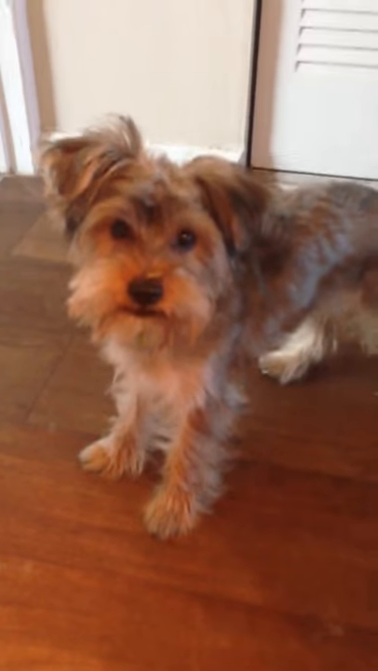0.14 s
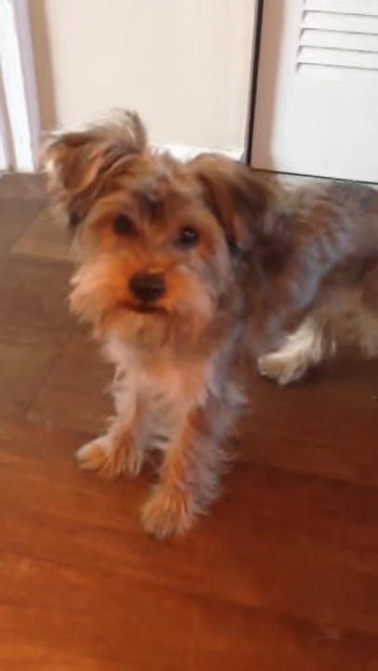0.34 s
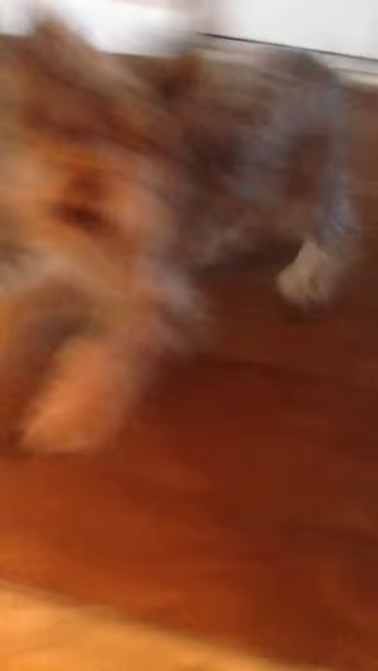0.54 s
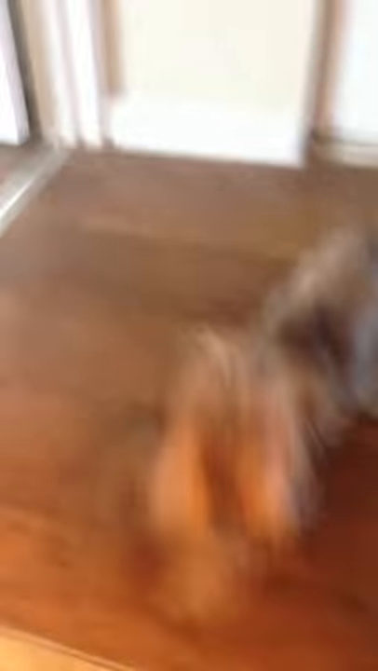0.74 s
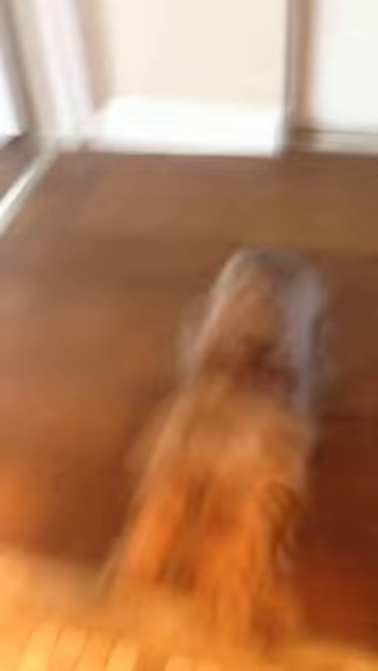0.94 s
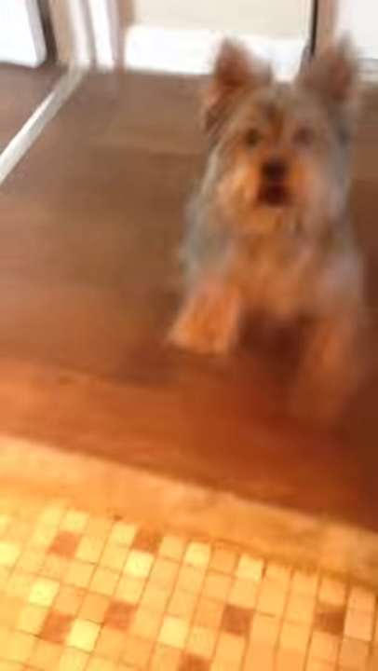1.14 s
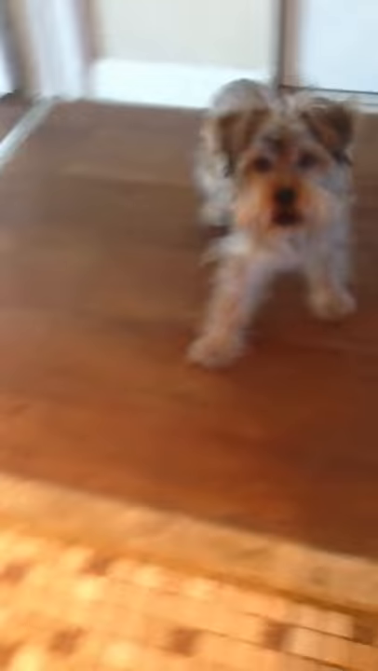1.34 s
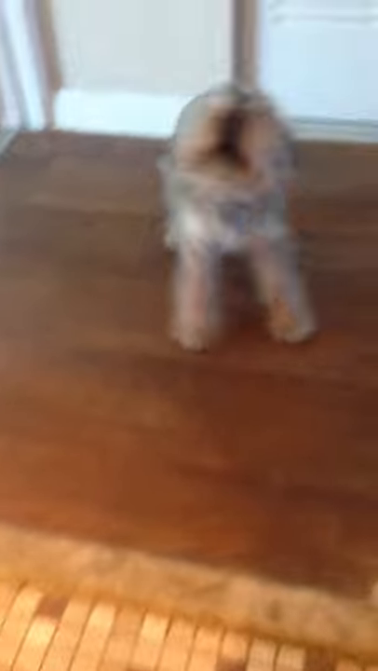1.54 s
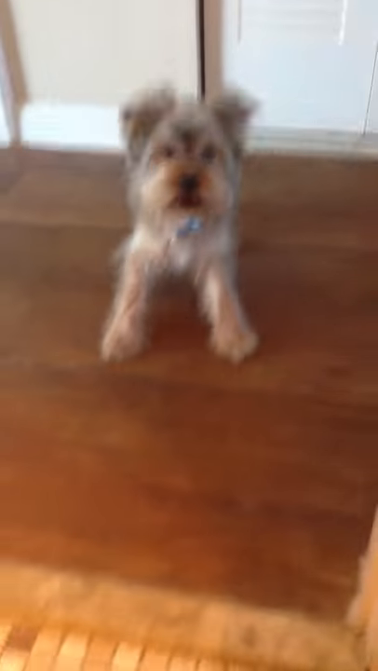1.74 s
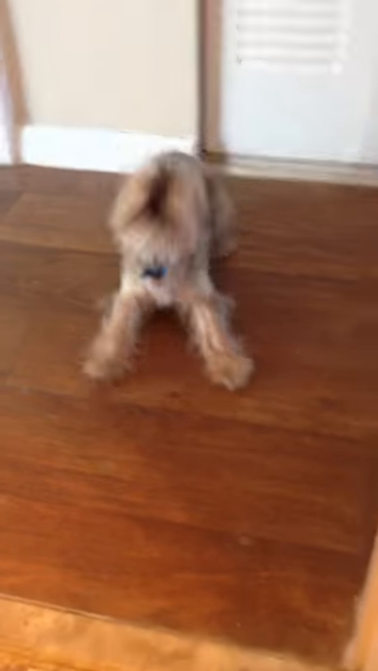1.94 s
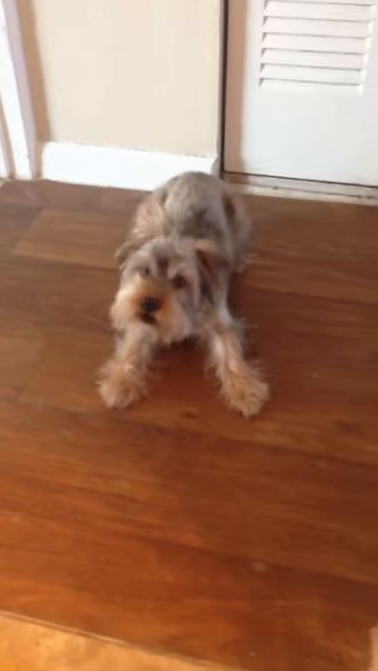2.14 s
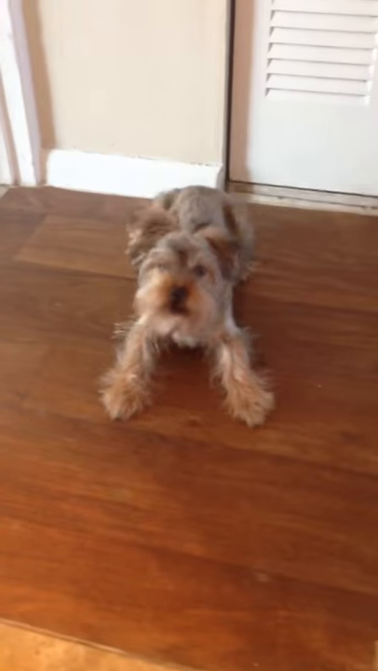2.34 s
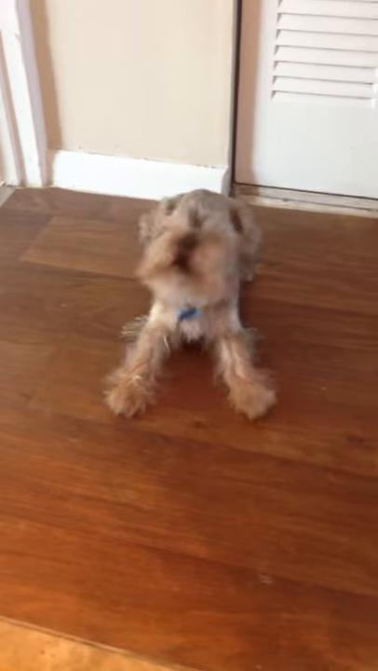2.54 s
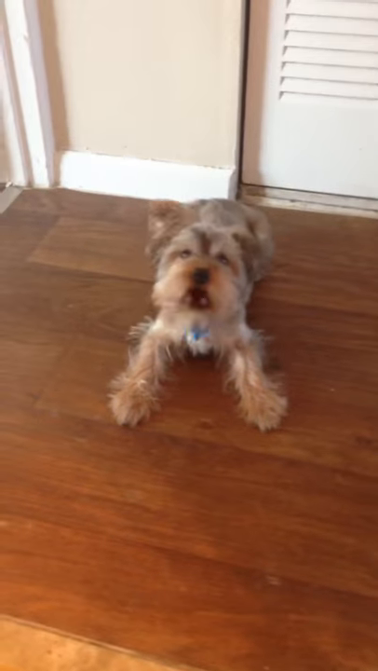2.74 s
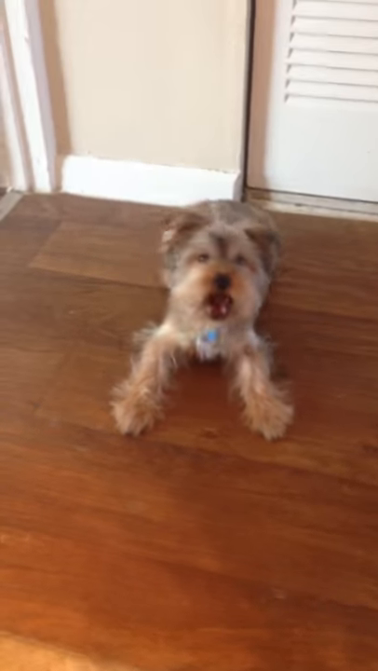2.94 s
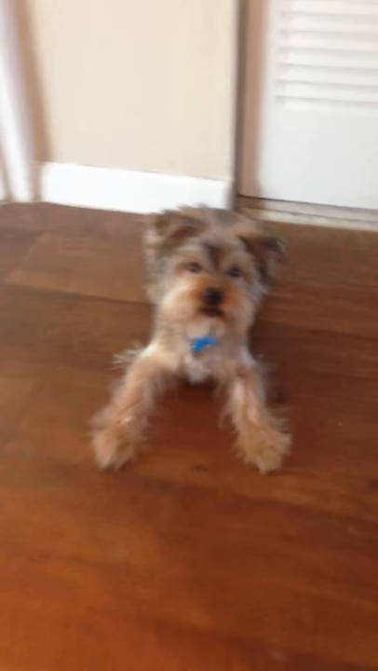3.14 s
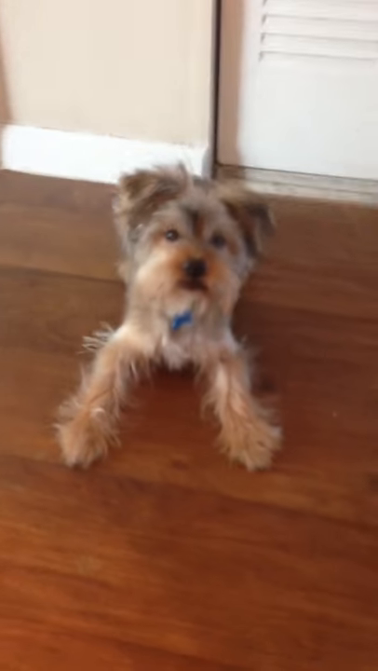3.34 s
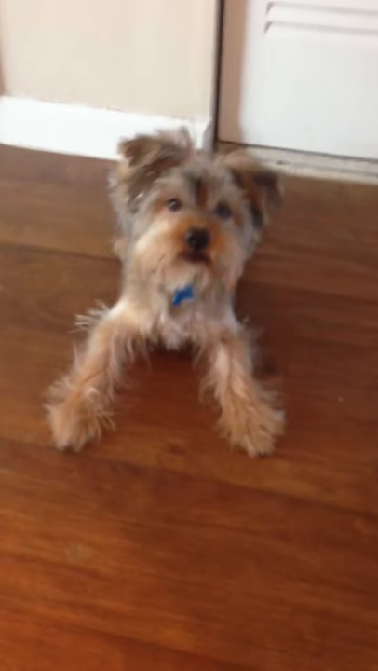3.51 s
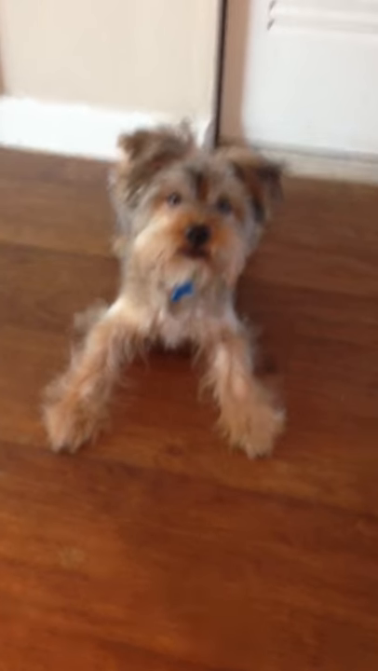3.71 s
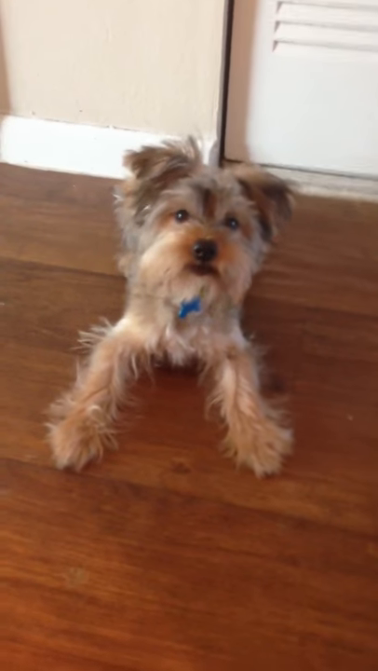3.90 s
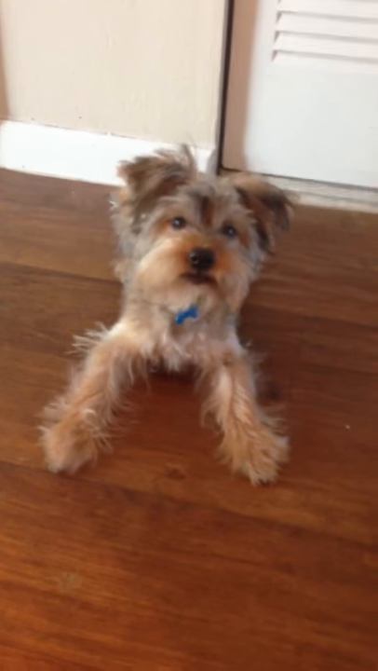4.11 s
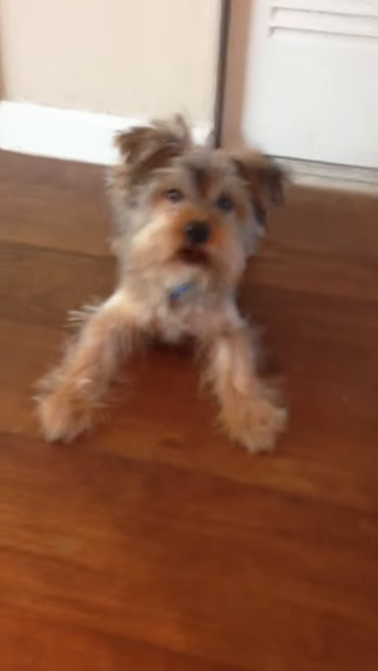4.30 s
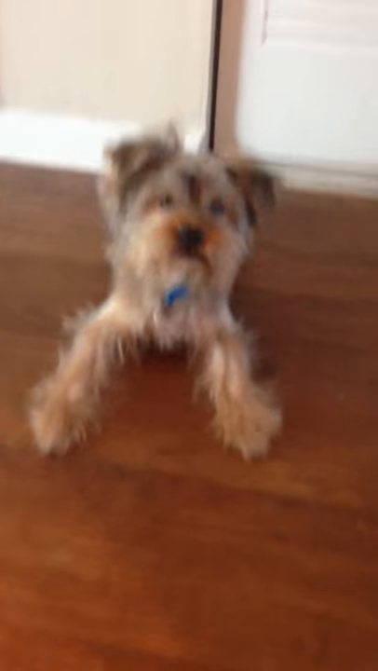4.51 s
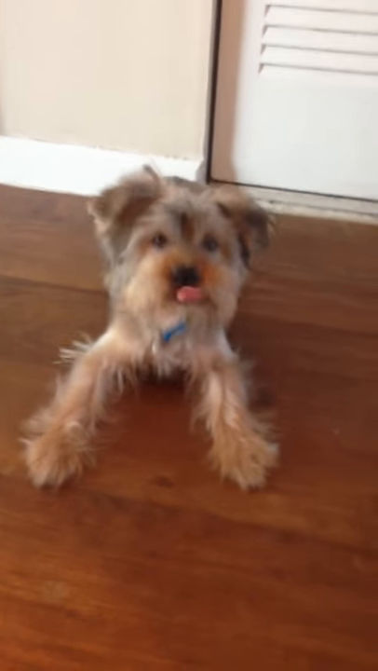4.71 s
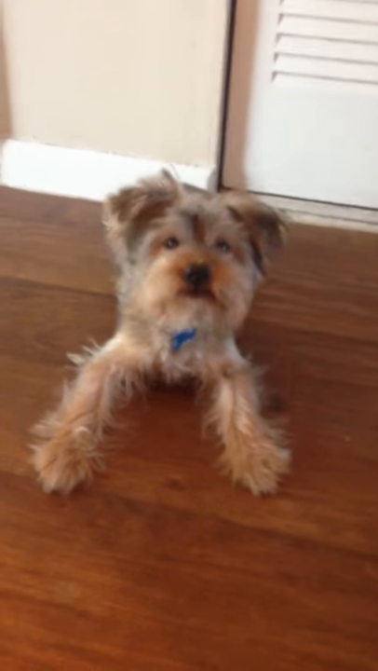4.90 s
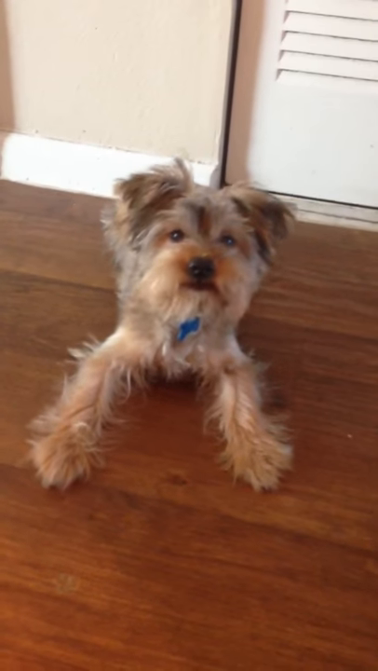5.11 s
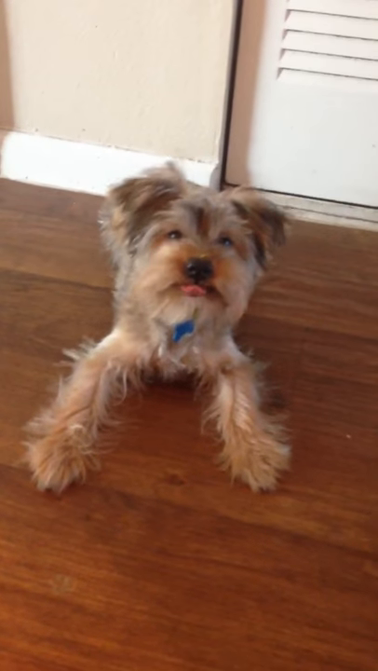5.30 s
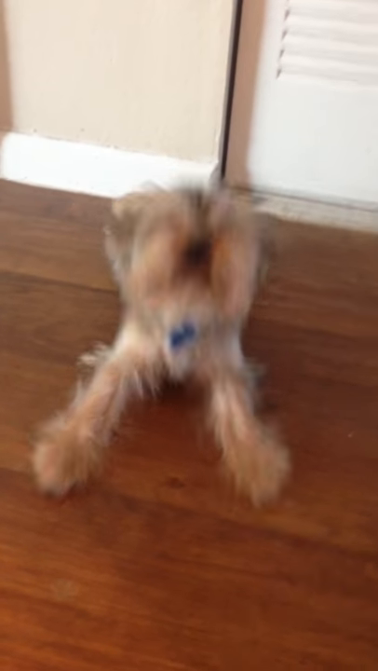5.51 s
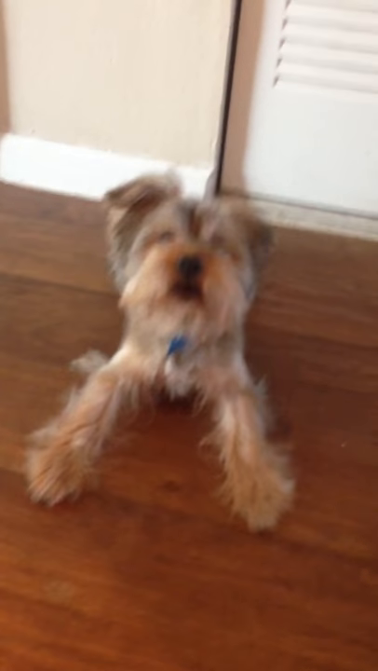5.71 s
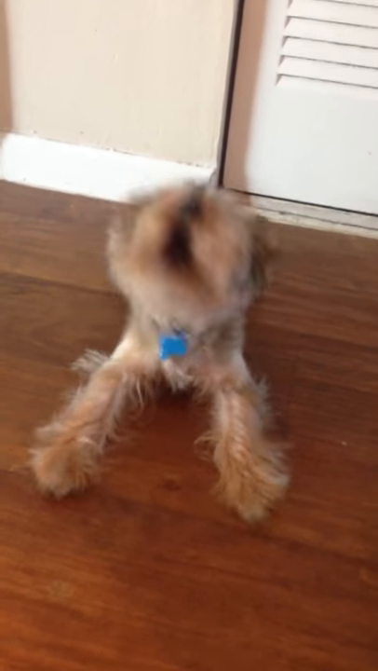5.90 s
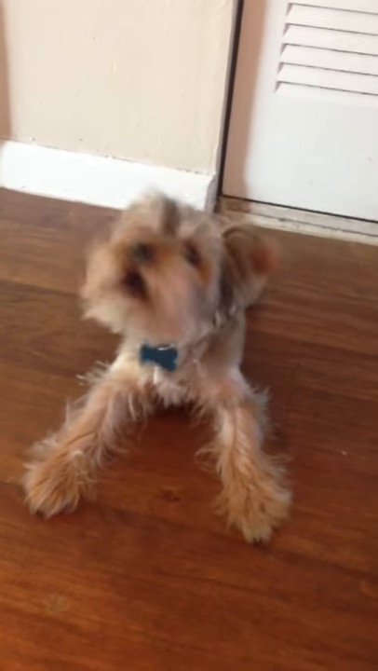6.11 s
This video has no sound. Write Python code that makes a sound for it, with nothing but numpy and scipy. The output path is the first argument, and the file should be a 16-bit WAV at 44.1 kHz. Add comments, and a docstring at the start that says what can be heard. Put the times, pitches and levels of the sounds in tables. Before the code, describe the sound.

In a bare room with a hard floor, a small dog close to the microphone yelps five times in an uneven run, its paws scuffing and its tag clinking faintly. A quiet stretch follows, holding only soft shuffles, tiny ticks and wet lip licks over a low hush. Two more gruff, high barks come near the end, each with a short echo off the walls.

```python
"""A paw scuffs the hard floor of a bare room, then a small dog barks five times, pauses, and barks twice.
Each bark is a rough yelp that rises and falls in pitch: shaking vocal folds and puffs of air sound
through a mouth that starts wide and slowly shuts. The walls and floor ring on after it.
Between barks, paws scuff, claws tick, a collar tag clinks, and the dog licks its lips and breathes in.
A faint hush lies under it all, and a limiter holds the barks down."""
import sys
import numpy as np
from scipy import signal
from scipy.io import wavfile
from scipy.ndimage import uniform_filter1d, minimum_filter1d

SR = 44100
rng = np.random.default_rng(int(sys.argv[2]) if len(sys.argv) > 2 else 0)


def generate_wav(signal):
    """Clip the signal to [-1, 1] and save it as 16-bit WAV at the path in sys.argv[1]."""
    frames = np.transpose(np.atleast_2d(signal))
    scaled = np.clip(frames, -1, 1) * 32767
    pcm = np.round(scaled).astype(np.int16)
    wavfile.write(sys.argv[1], SR, pcm)


N = 271215

# The tone of the quiet room and microphone hiss. Each row: frequency in Hz, level in dB.
HUSH_TONE = [(30, -33), (90, -14.5), (180, -0.5), (350, -5), (800, -10.5), (1300, -10.5), (2200, -13),
             (3200, -8), (4500, -11.5), (14400, -16), (16000, -24)]
# Short soft rustles: paws rubbing the floor, and a quick breath in just before the sixth bark.
# Each row: start in seconds, level in dB, strongest frequency in Hz, seconds to fade by 16 dB.
RUSTLES = [(0.5447, -37, 2757, 0.025), (1.137, -46.5, 2525, .035), (1.358, -59.5, 4850, 0.04),
           (1.777, -40.5, 2900, 0.05), (1.804, -38, 2827, 0.046), (2.814, -49.5, 2780, 0.045),
           (3.089, -56.5, 1118, 0.018), (3.1, -54, 2655, 0.041), (3.24, -58.5, 1342, 0.057),
           (4.786, -62.5, 1763, 0.046), (5.417, -57.5, 2400, 0.032)]
# The barks. Each row: start and length in seconds, level in dB, how far below that it begins in dB,
# swell time in seconds, share of the length before it fades, top pitch in Hz, roughness from 0 to 1,
# the throat resonance's top in Hz, its strength in dB and the share of that top it sinks to,
# open mouth resonance in Hz, then brightness, opening bite, rasp and chest boom, all in dB.
BARKS = [ (0.6174, 0.14, -11, -4.5, .01, 0.57, 588.5, 0.62, 1060, 2, 1, 3270, 4.5, -1, -23, -24.5),
         (.84, 0.22, -9, -18.5, 0.054, 0.2, 687.8, .55, 1220, 3, .58, 2900, -5.5, 1.5, -28.5, -18),
         (1.514, .15, -7.5, -16.5, 0.05, 0.34, 704.6, 0.5, 1100, 7, 0.67, 2966, 3, -1, -24, -18.5),
         (1.953, 0.17, -6, -23, .06, .36, 627.6, 0.55, 1067, 7, 0.97, 2798, -0.5, 8, -28, -18),
         (2.476, .19, -13.5, -28, 0.039, 0.51, 627.4, 0.5, 1280, 7, 0.49, 2900, 0.5, 5, -26, -15.5),
         (5.44, .148, -9.5, -16.5, 0.015, 0.45, 659.2, 0.58, 1060, 9, 1, 2856, 2.5, 13.5, -30, -17.5),
         (5.921, .168, -8, -32, 0.04, 0.3, 626.3, 0.59, 1107, 9, .85, 2840, 2, 12, -27, -19.5), ]
# What the whole airway lets through. Each row: frequency in Hz, gain in dB.
AIRWAY_TONE = [(40, -51.5), (130, -42.5), (230, -27), (340, -13.5), (460, -5), (640, 1.5), (950, 7.5),
               (1400, 3.5), (1600, -0.5), (2000, 0), (2500, -21), (3400, -33.5), (5500, -47),
               (16000, -61.5)]
# Air rasping over tongue and teeth. Each row: frequency in Hz, level in dB.
RASP_TONE = [(1500, -28), (3000, 3.5), (4500, 0.5), (5500, -1), (7200, 2), (8800, -1), (10200, 3.5),
             (12000, -0.5), (15000, 0.5), (16000, -15.5)]
# The mouth's higher resonances. Each row: multiple of the jaw's frequency, gain in dB.
MOUTH_OVERTONES = [(1.8, -2), (2.8, -2.5), (3.5, -2)]
# Claws and wet lips. Each row: start in seconds, level in dB, strongest frequency in Hz.
TICKS = [(1.121, -60, 9000), (1.34, -49.5, 8400), (1.393, -48.5, 7400), (1.464, -54, 4580),
         (1.882, -68, 8010), (2.295, -57, 3300), (2.33, -59.5, 3300), (2.362, -56, 3300),
         (2.397, -56, 3250), (3.01, -58.5, 8240), (4.335, -54.5, 1500), (4.521, -57.5, 902),
         (4.58, -58.5, 3420), (4.763, -51.5, 1900), (4.822, -53, 2180), (4.863, -52, 1776)]
# The metal collar tag's notes. Each row: frequency in Hz, level in dB, seconds to fade by 60 dB.
TAG_NOTES = [(3780, -7, 0.04), (10570, 0.5, 0.06), (12200, -3, 0.0609), (14740, -8, .08)]
# Hits of the tag. Each row: start in seconds, level in dB.
TAG_HITS = [(1.325, -65.5), (1.472, -50.5), (1.854, -54.5)]
# Notes that build up between the walls. Each row: frequency in Hz, gain in dB.
STANDING_WAVES = [(666, -4.5), (740, -3.5), (941, 5.5)]
# First echoes from walls and doors. Each row: typical delay in milliseconds, strength as a share.
ECHOES = [(1.9, 0.14), (4.1, 0.87), (6.3, 0.41), (9.2, 0.34), (12.4, 0.36), (17.5, .22)]
# The muzzle aims treble forward, so the walls get less. Each row: frequency in Hz, gain in dB.
ECHO_TONE = [(2000, -1.5), (3500, -1), (6000, -6.5), (14000, -9.5)]
# How long the room rings. Each row: frequency in Hz, seconds to fade by 60 dB.
RING_TIMES = [(150, .9), (400, 0.35), (750, 0.59), (1400, 0.63), (2200, 0.63), (3200, 0.42), (7000, 0.33),
              (14000, .36)]
# The tone of that ringing. Each row: frequency in Hz, gain in dB.
RING_TONE = [(80, -12.5), (170, 7.5), (290, -5), (430, 10), (750, 6.5), (1050, -12), (1400, -1.5),
             (1800, -1.5), (2250, -5), (2650, -7.5), (3300, -4.5), (5000, 0), (6800, 8.5), (14000, -8.5)]
# The quick flurry of echoes from the near walls. Each row: frequency in Hz, gain in dB.
FLURRY_TONE = [(80, -10.5), (170, 0.5), (290, -4.5), (600, 6), (1050, 2), (1600, 2.5), (2300, -7),
               (3000, -3.5), (5000, -4.5), (14000, -2)]
# The microphone weakens deep bass. Each row: frequency in Hz, gain in dB.
MICROPHONE_TONE = [(20, -20.5), (70, -17.5), (110, -8.5), (160, 3.5), (200, -4), (16000, 0)]


def amp(db):
    """Turns decibels into a number to multiply by."""
    return 10 ** (np.asarray(db) / 20)


def unit(x):
    """Scales a sound to an average power of 1."""
    return x / np.sqrt(np.mean(x ** 2) + 1e-20)


def read(points, hz):
    """Looks up a table at any frequency, blending between its rows."""
    f, value = np.transpose(points)
    return np.interp(np.log(hz + 1), np.log(f + 1), value)


def add(mix, start, sound):
    """Mixes a sound in at a start time in seconds."""
    part = mix[round(start * SR):][:len(sound)]
    part += sound[:len(part)]


def colour(x, points, size=2048):
    """Gives a sound the tone in a table, without smearing it earlier in time."""
    log_gain = np.log(amp(read(points, abs(np.fft.fftfreq(size, 1 / SR)))))
    taps = np.fft.ifft(np.exp(np.conj(signal.hilbert(log_gain)))).real
    return signal.fftconvolve(x, taps[:size // 2])[:len(x)]


def resonate(x, hz, width_hz):
    """A resonance: keeps the sound near one frequency, which may glide."""
    turn = np.exp(2j * np.pi * np.cumsum(hz * np.ones(len(x))) / SR)
    r = np.exp(-np.pi * width_hz / SR)
    return 2 * (turn * signal.lfilter([(1 - r) ** 2], [1, -2 * r, r * r], x / turn)).real


def wander(t, rate):
    """A random curve, mostly within -1 to 1, that turns `rate` times a second."""
    steps = rng.standard_normal(size=1024)
    return np.interp((t - t[0]) * rate, np.arange(len(steps)), steps)


def arch(progress, start, peak_at, end):
    """Rises from `start` to 1 and sinks to `end` as progress runs from 0 to 1."""
    rising = (1 - start) * (1 - progress / peak_at) ** 2
    falling = (1 - end) * ((progress - peak_at) / (1 - peak_at)) ** 2
    return 1 - np.where(progress < peak_at, rising, falling)


def hush():
    """The faint, steady noise of room and microphone."""
    return amp(-68) * unit(colour(rng.standard_normal(N), HUSH_TONE))


def rustle(db, hz, length):
    """A sliding paw or a quick breath in: gritty noise that swells more slowly the longer it is."""
    t = np.arange(SR // 4) / SR
    grit = rng.standard_normal(len(t)) * amp(2 * wander(t, 340))
    tone = [(60, -20), (hz / 8, -8), (hz / 1.4, -6), (hz, 0),
            (hz * 1.1, -10), (hz * 1.7, -22), (hz * 8, -34)]
    swell = np.minimum(t / (0.023 * (length / 0.052) ** 3), 1)
    return amp(db) * unit(colour(grit, tone)) * swell * amp(-16 * t / length)


def room(x):
    """Sound bounces off floor and walls and rings on; the echoes fall a little differently each time."""
    heard = np.concatenate([x, np.zeros(SR)])
    heard += sum(amp(db) * resonate(heard, hz, width_hz=24) for hz, db in STANDING_WAVES)
    add(heard, 0.00093, 0.34 * x)  # the bounce off the floor just under the muzzle
    sideways = colour(x, ECHO_TONE)
    for ms, share in ECHOES:
        add(heard, ms / 1000 * rng.uniform(.88, 1.12), share * sideways)
    bounces = rng.choice([-1., 1.], SR) * (rng.random(SR) < 5000 / SR)  # about 5000 a second
    hz, t, bands = signal.stft(unit(bounces) / np.sqrt(SR), SR, nperseg=256)
    ring = amp(9.5 + read(RING_TONE, hz)[:, None] - 60 * t / read(RING_TIMES, hz)[:, None])
    flurry = amp(12.5 + read(FLURRY_TONE, hz)[:, None] - 60 * t / 0.19)
    tail = signal.istft(bands * (flurry + ring), SR, nperseg=256)[1]
    tail *= np.clip((np.arange(len(tail)) / SR - .003) / 0.0034, 0, 1)
    add(heard, 0, signal.fftconvolve(x, tail))
    return heard


def breath(t, length, onset_db, attack, hold):
    """The push of air behind a bark swells fast, holds, then falls ever faster."""
    swell_db = onset_db * np.maximum(1 - t / attack, 0) ** 2.3
    release = np.maximum(t / length - hold, 0) / max(1 - hold, .05)
    soft_edges = np.clip(t / 0.0013, 0, 1) * np.clip((length - t) / 0.0083, 0, 1)
    return soft_edges * amp(swell_db - 22 * release ** 1.25)


def vocal_folds(t, progress, pitch_hz, roughness):
    """The folds buzz unevenly and chop the air. Gives the full buzz, soft puffs and bright puffs."""
    clearing = 0.13 * np.exp(-((progress - .2) / 0.12) ** 2)  # clearest while the pitch climbs
    rough = np.clip(roughness * (1 - clearing), .05, .95)
    cycles = np.cumsum(pitch_hz * (1 + .065 * rough * wander(t, 450))) / SR
    pulses = sum(np.cos(2 * np.pi * k * cycles) for k in range(1, 11))
    # strong and weak pulses take turns and stumble, which makes the voice gruff
    pulses *= 1 + rough * (1.5 * np.cos(np.pi * cycles) + .55 * wander(t, 380))
    air = rng.standard_normal(size=(2, SR))[:, :len(t)] * (0.067 + np.exp(-(cycles % 1) / .5))
    puffs = unit(signal.sosfilt(signal.butter(6, 5500, fs=SR, output="sos"), air[0]))
    breathy = rough ** 1.4
    return (1 - breathy) * unit(pulses) + breathy * puffs, puffs, air[1]


def rasp(t, air, mouth_hz):
    """Air sputters over tongue and teeth, and its resonances sink as the jaw shuts."""
    hiss = unit(colour(air, RASP_TONE)) * amp(2.8 * wander(t, 260))
    jaw_hz = 2500 * (mouth_hz / 2500) ** 0.5
    opening = (mouth_hz / 2900) ** 3.5  # plain hiss escapes only past parted teeth
    overtones = sum(amp(db) * resonate(hiss, k * jaw_hz, 950) for k, db in MOUTH_OVERTONES)
    return unit(opening * hiss + overtones)


def bark(length, level_db, onset_db, attack, hold, top_hz, roughness, throat_top_hz, throat_db,
         throat_end, open_hz, bright_db, bite_db, rasp_db, chest_db):
    """The buzz of the folds rings in throat, chest and closing mouth while the pitch rises and falls."""
    t = np.arange(0, length, 1 / SR)
    progress = t / length
    pitch_hz = top_hz * arch(progress, start=.53, peak_at=.42, end=.53) * (1 + .025 * wander(t, 60))
    throat_hz = throat_top_hz * arch(progress, start=.79, peak_at=.32, end=throat_end)
    mouth_hz = open_hz * .54 ** (progress ** 1.17)
    burst_db = bite_db * np.exp(-(t / .03) ** 2)  # the first burst of air sharpens mouth and rasp
    closing_db = bright_db - 4 * progress  # the closing mouth dulls the voice
    buzz, puffs, air = vocal_folds(t, progress, pitch_hz, roughness)

    body = colour(buzz, AIRWAY_TONE)
    # the throat stands out most while the mouth is wide
    throat = amp(throat_db) * (mouth_hz / 2600) ** 0.26 * resonate(body, throat_hz, 560)
    hoarse = 0.87 * buzz + 0.13 * puffs
    mouth = amp(closing_db + burst_db + 0.5) * resonate(resonate(hoarse, mouth_hz, 700), mouth_hz, 900)
    cheeks = amp(closing_db - 3) * resonate(buzz, .68 * mouth_hz, 460)
    voice = body + throat + mouth - cheeks
    voice /= np.sqrt(uniform_filter1d(voice ** 2, size=900) + 1e-9)  # evens out the loudness

    # the chest fades as it empties, and booms more at low pitch
    boom_db = chest_db - 3.5 * progress + 21 * np.log2(502.6 / pitch_hz)
    chest = amp(boom_db) * unit(resonate(resonate(buzz, 380, 210), 340, 340))
    lag_db = .3 * onset_db * np.maximum(1 - t / attack, 0)  # rasp needs fast air, so it swells late
    hiss = amp(rasp_db - 7 * progress + 0.93 * burst_db + lag_db) * rasp(t, air, mouth_hz)
    gust = amp(-45) * wander(t, 140)  # the bark's air nudges the microphone
    return amp(level_db) * breath(t, length, onset_db, attack, hold) * (voice + chest + hiss + gust)


def tick(db, hz):
    """A claw or a wet lip makes a tiny snap that dies in a few milliseconds."""
    t = np.arange(SR // 16) / SR
    tone = [(hz / 8, -14), (hz / 1.3, -10), (hz, 0), (hz, -10), (hz * 4, -24), (hz * 9, -36)]
    snap = unit(colour(rng.standard_normal(len(t)), tone))
    return amp(db) * snap * np.exp(-t / 0.0022)


def clink(db):
    """The collar tag swings against its ring and sounds a few high, short notes."""
    t = np.arange(SR // 5) / SR
    return amp(db) * sum(amp(note_db - 60 * t / fade_s) * np.sin(2 * np.pi * hz * t)
                         for hz, note_db, fade_s in TAG_NOTES)


def scene():
    """The barks and the dog's small noises in the room, over the hush."""
    dog, small_noises = np.zeros((2, N))
    for start, *settings in BARKS:
        add(dog, start, room(bark(*settings)))
    for source, table in (rustle, RUSTLES), (tick, TICKS), (clink, TAG_HITS):
        for start, *settings in table:
            add(small_noises, start, source(*settings))
    add(dog, 0, room(small_noises))
    return (amp(2.0) * colour(dog, MICROPHONE_TONE) + hush())[None]


def hold_peaks(db, fall_db_per_s):
    """Jumps up with each peak, then sinks steadily."""
    fall = np.arange(N) * fall_db_per_s / SR
    return np.maximum.accumulate(db + fall) - fall


def duck(x, above_db=-25, most_db=3):
    """Loud sound turns the volume down a little, and it creeps back."""
    over_db = np.clip(20 * np.log10(abs(x[0]) + 1e-9) - above_db, 0, most_db)
    return x * amp(-uniform_filter1d(hold_peaks(over_db, fall_db_per_s=2.5), size=441))


def limit(x, ceiling_db=-4):
    """The volume dips just ahead of each loud peak and comes back quickly."""
    peak_db = hold_peaks(20 * np.log10(abs(x[0]) + 1e-9), fall_db_per_s=500)
    gain_db = minimum_filter1d(-np.maximum(peak_db - ceiling_db, 0), size=101)
    return x * amp(uniform_filter1d(uniform_filter1d(gain_db, size=81), size=81))


def record(dry):
    """Holds the barks down, then cuts the treble above 15700 Hz."""
    treble_cut = signal.firwin(255, 15700, window=("kaiser", 9), fs=SR)
    return signal.oaconvolve(limit(duck(dry)), treble_cut[None], "same")


dry = scene()
out = record(dry)
generate_wav(out)
```